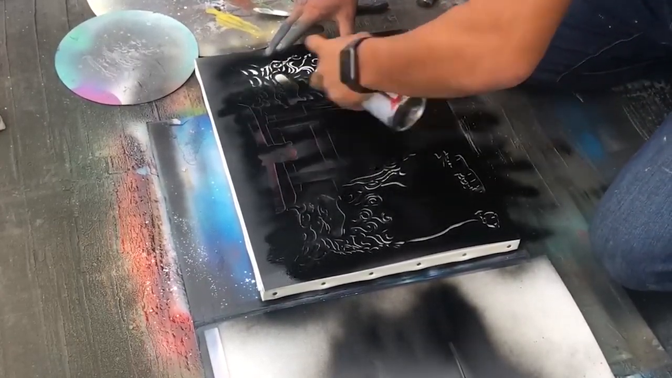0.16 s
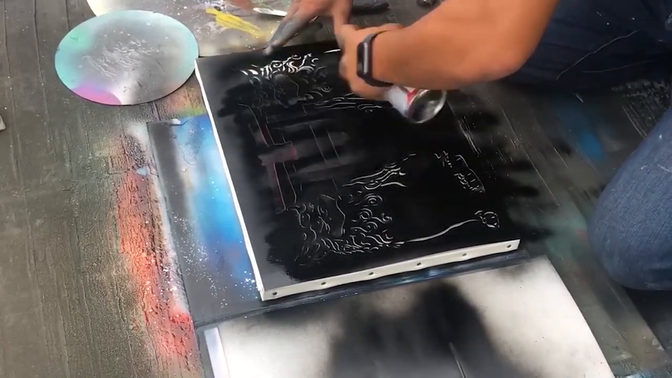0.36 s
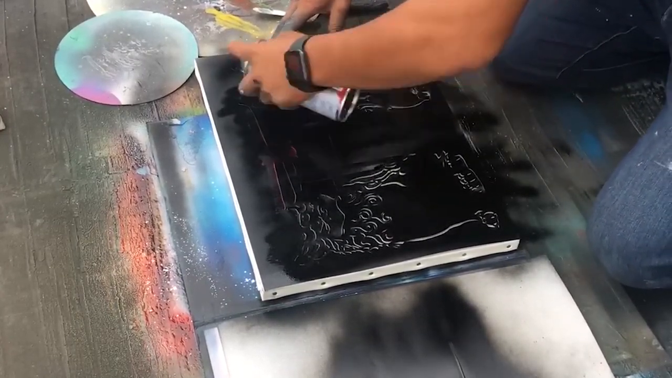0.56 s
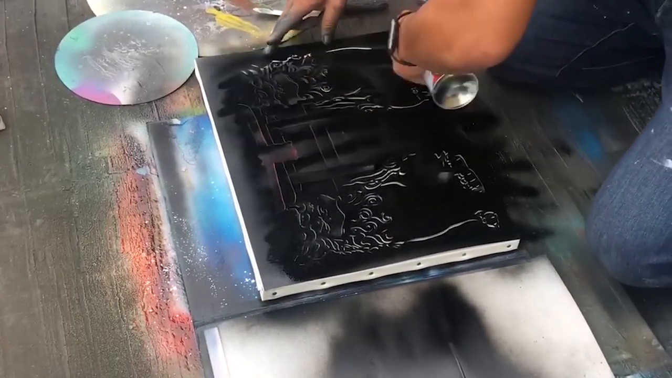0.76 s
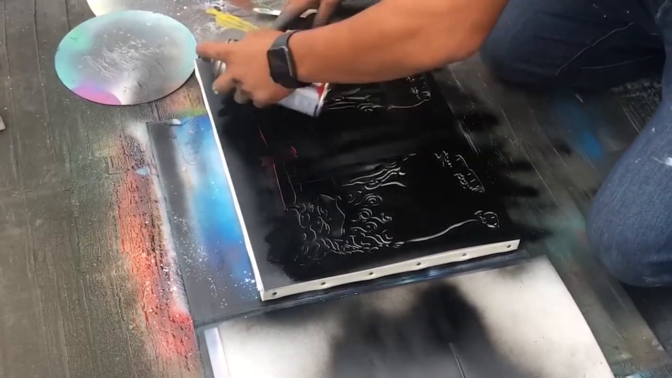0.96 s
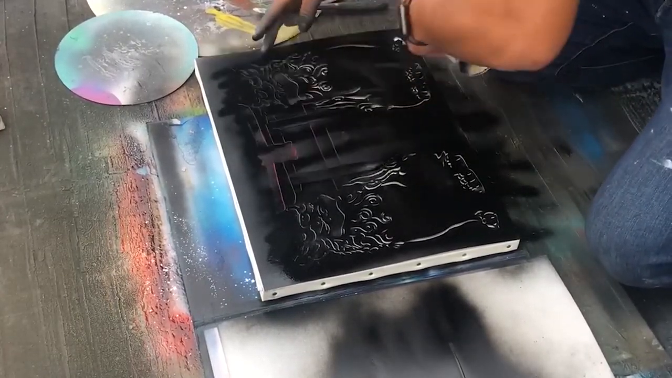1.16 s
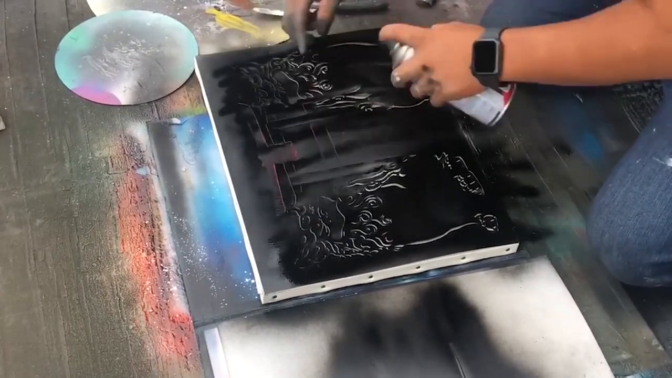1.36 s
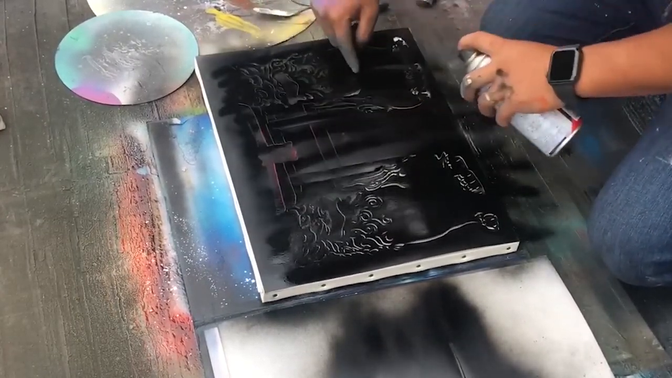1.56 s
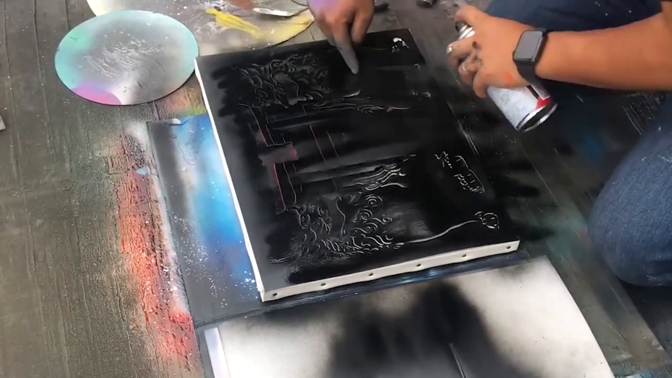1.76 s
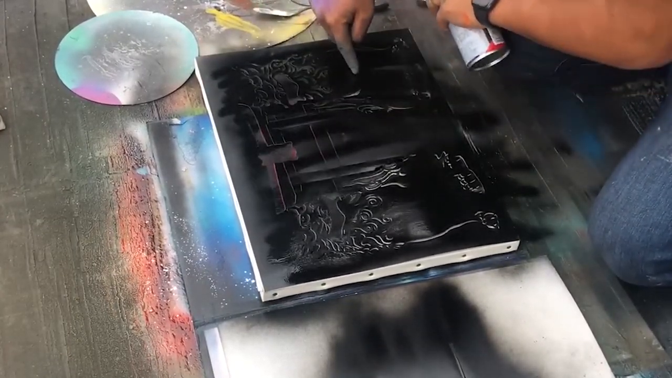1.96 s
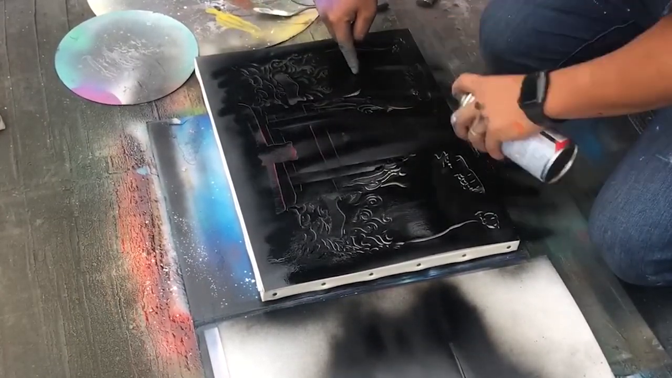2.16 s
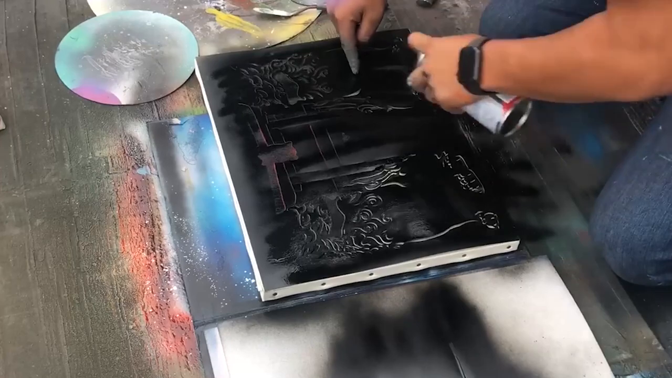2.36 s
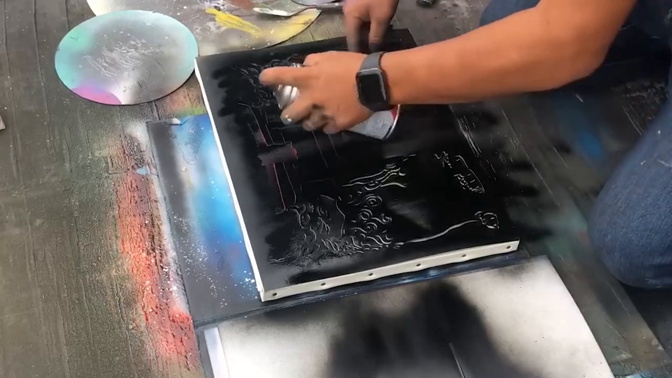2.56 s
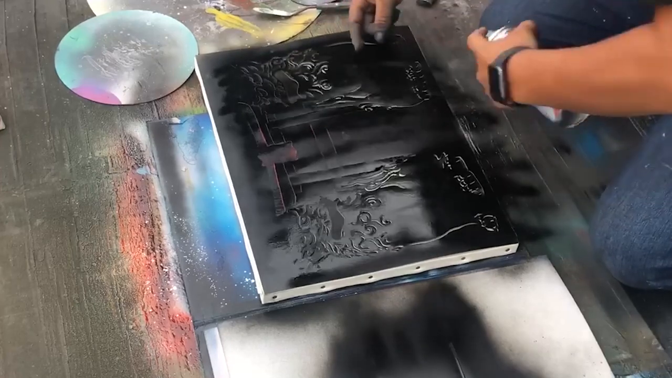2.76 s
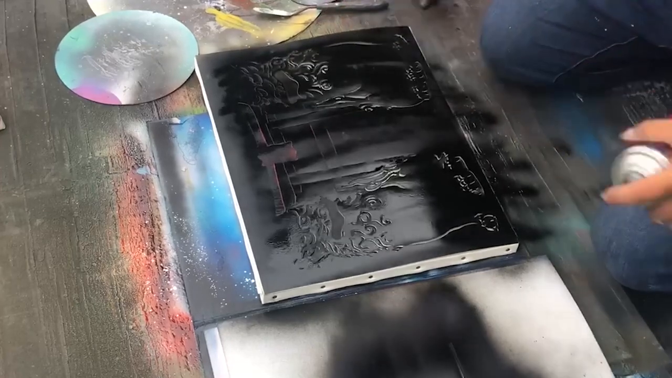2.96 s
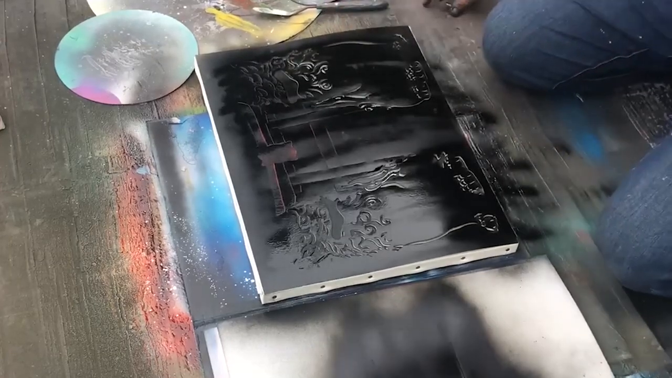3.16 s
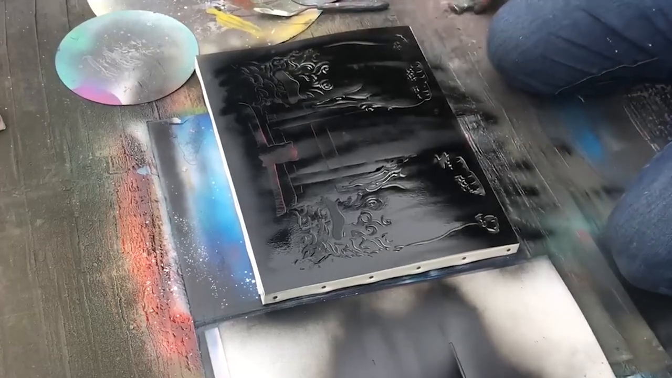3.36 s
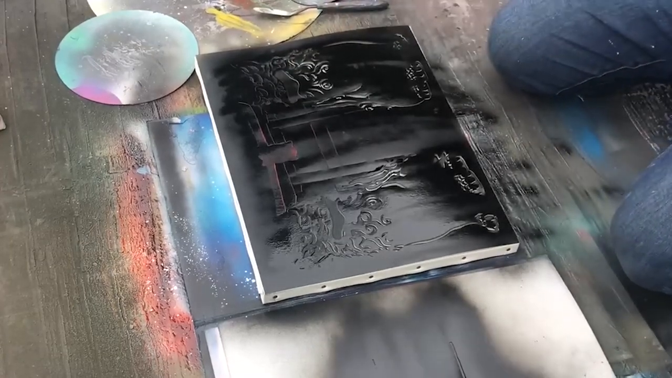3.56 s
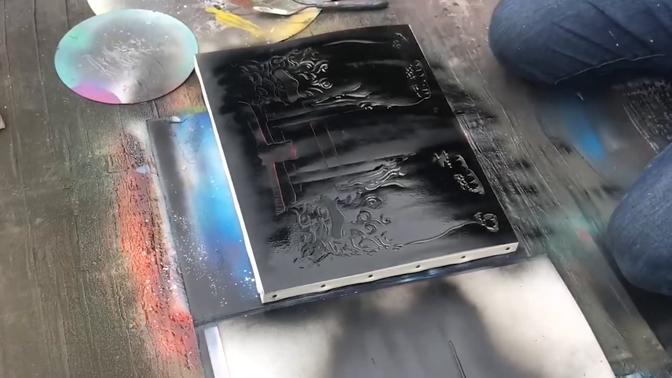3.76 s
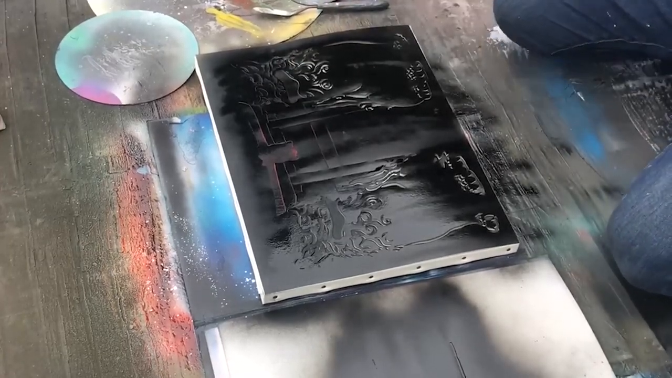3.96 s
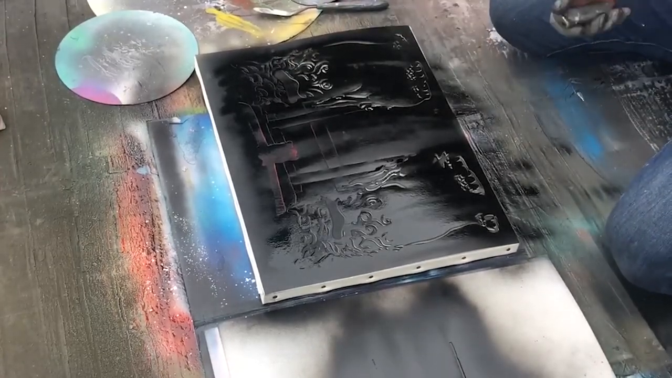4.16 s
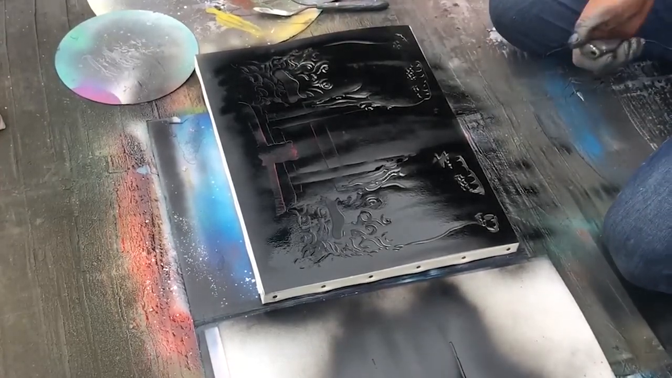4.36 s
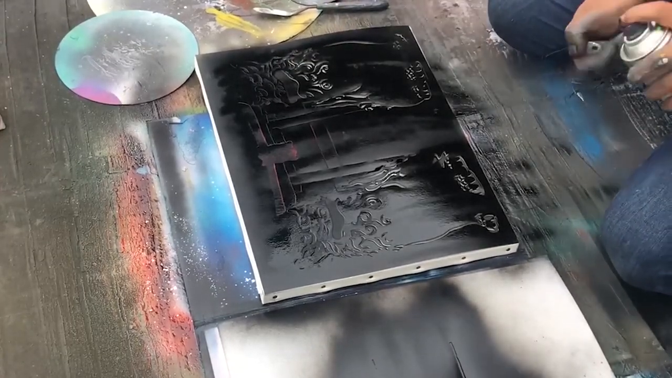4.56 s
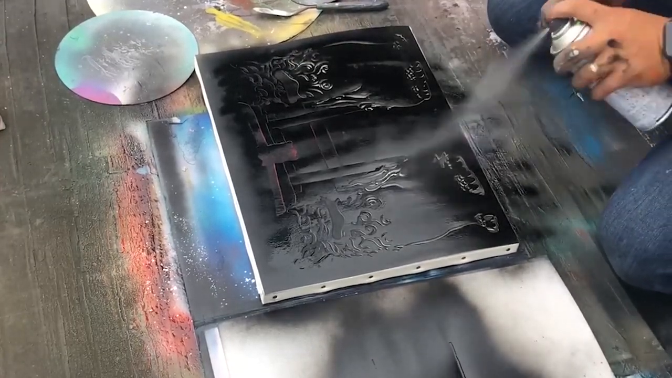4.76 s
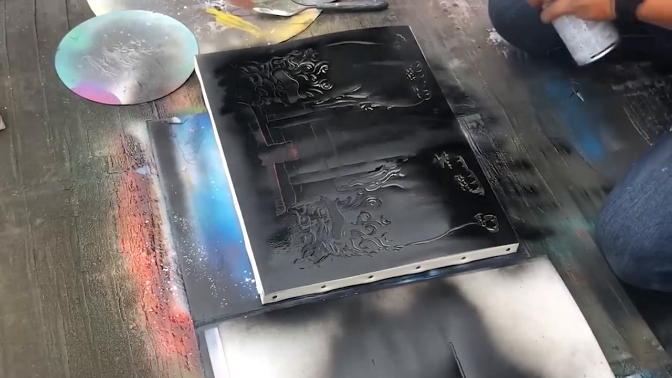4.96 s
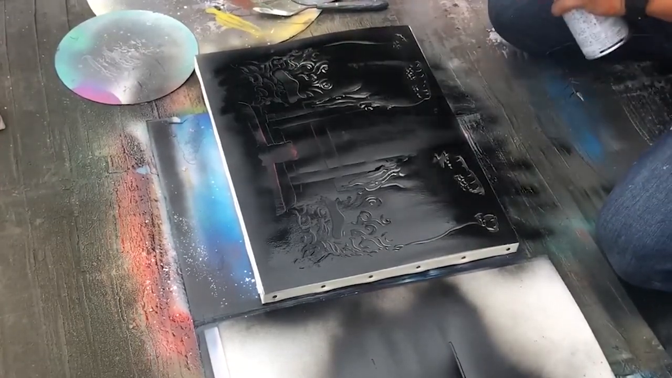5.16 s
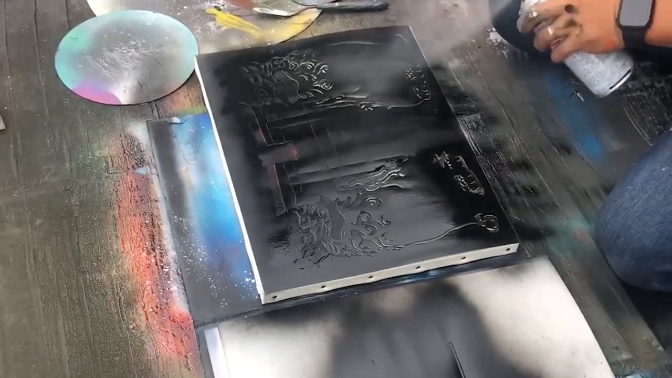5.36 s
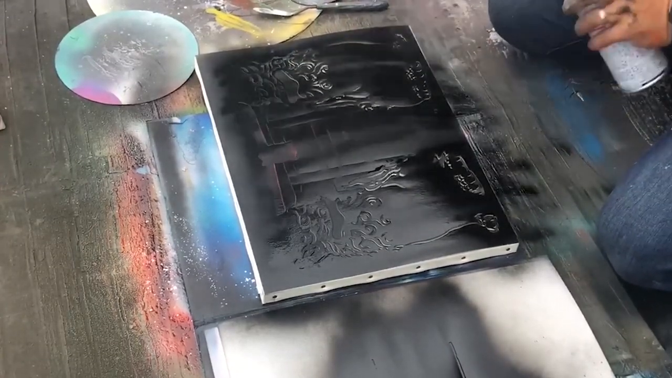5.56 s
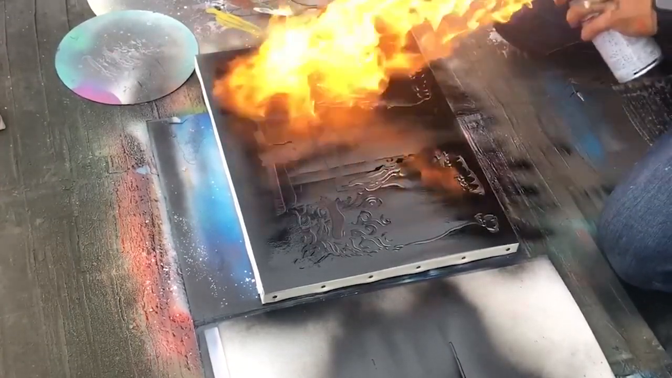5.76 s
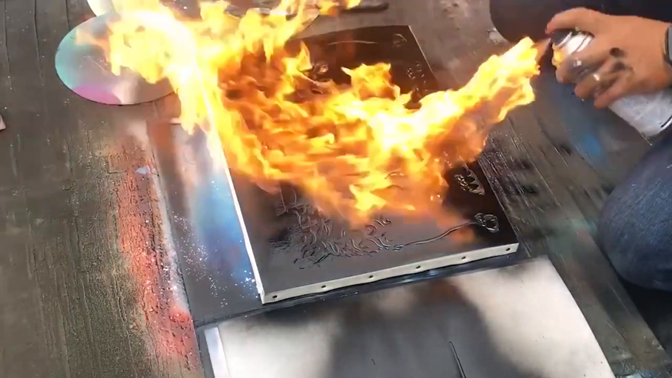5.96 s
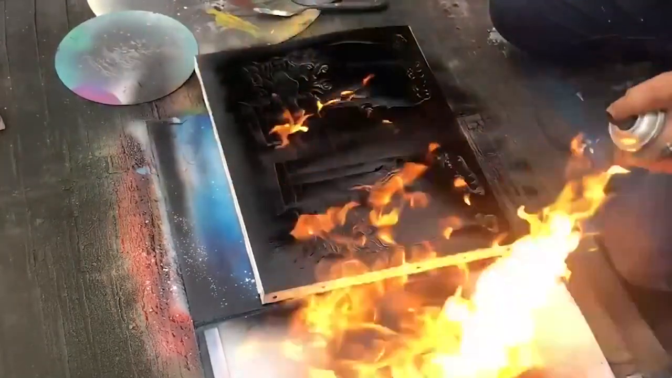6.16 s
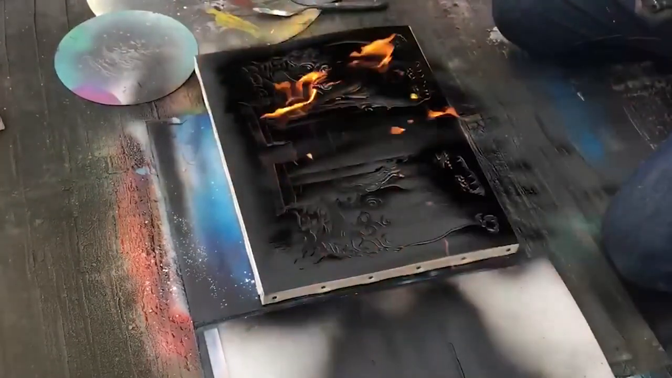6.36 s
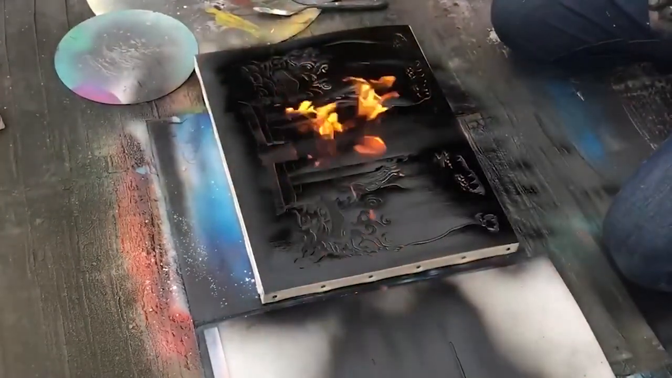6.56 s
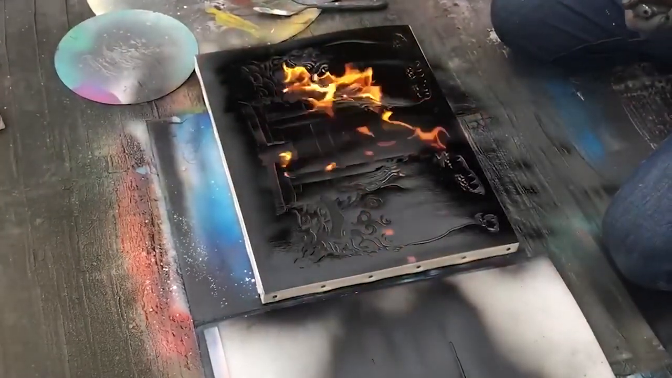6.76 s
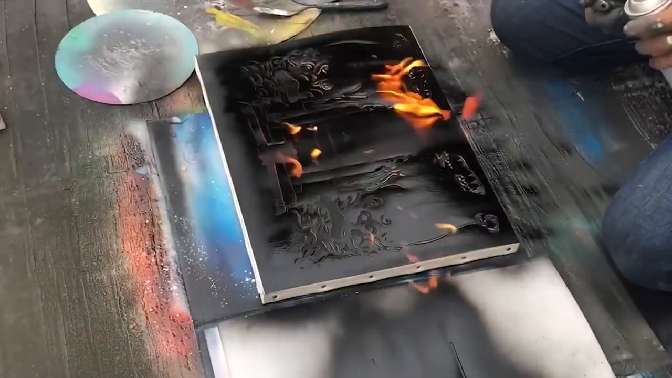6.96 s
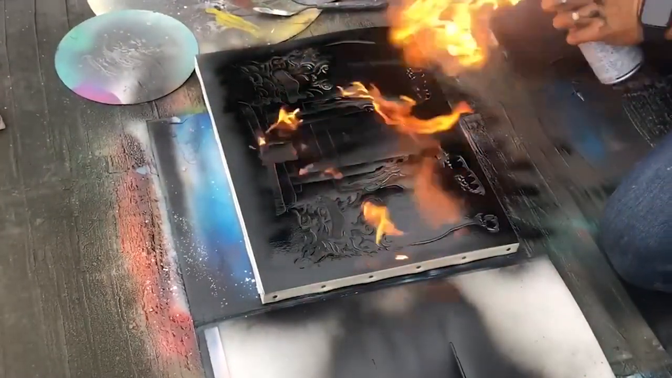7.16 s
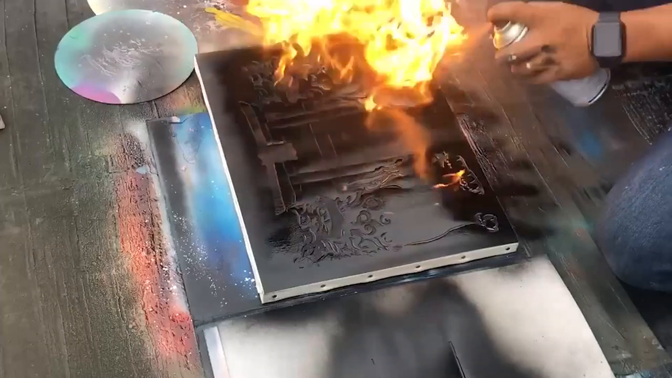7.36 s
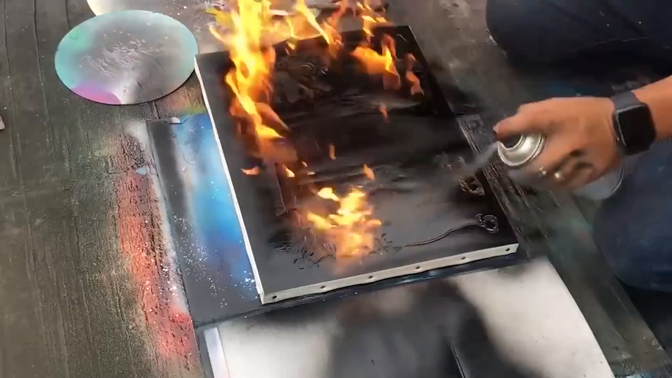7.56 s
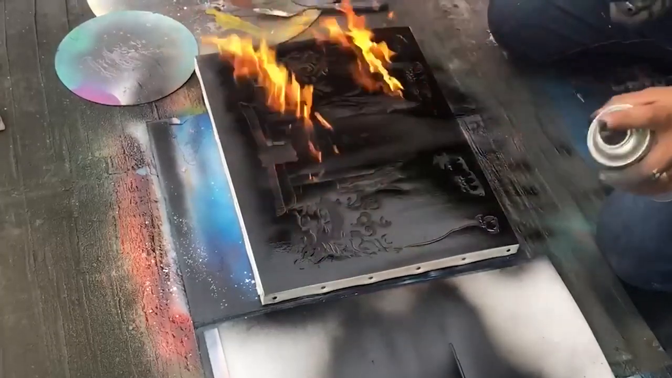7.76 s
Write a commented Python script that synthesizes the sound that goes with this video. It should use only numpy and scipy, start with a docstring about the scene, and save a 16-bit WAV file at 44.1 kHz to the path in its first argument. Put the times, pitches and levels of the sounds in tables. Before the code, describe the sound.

A spray can hisses in quick, clipped bursts while its mixing ball clicks and taps. After a pause the can knocks hard on pavement with a tinny clank, followed by light scrapes. Two longer hisses follow, then a sharp snap and the spray ignites into a roaring flare. Deep flutters and thumps batter the close outdoor microphone before a second, louder burn.

```python
"""Spray painter with a torch

Outdoors, a painter sprays a canvas on the ground in short bursts while the mixing ball clicks in the can.
A can is set down on the pavement, a lighter snaps, and the next bursts burn as a torch.
Jet, flame and wind are shaped noise; clicks, taps and knocks are pulses and decaying rings.
Each hiss is combed by its reflections off canvas and ground; wind and flame buffet the microphone."""
import sys
import numpy as np
from scipy import signal
from scipy.fft import rfft, irfft, next_fast_len
from scipy.io import wavfile
from scipy.ndimage import map_coordinates

SR = 44100
rng = np.random.default_rng(int(sys.argv[2]) if len(sys.argv) > 2 else 0)


def persist_wave(psi):
    """Save psi, clipped to +-1, as 16-bit WAV."""
    counts = np.round(np.clip(psi, -1, 1) * 32767).astype(np.int16)
    wavfile.write(sys.argv[1], SR, np.atleast_2d(counts).T)


N = 344421

# Tables named _COLOUR are relative noise or pulse spectra: freq_hz [Hz], density_db [dB per Hz]

# presses of the valve, each one sweep of the hand: start_s [s], end_s [s], hiss_db [dB],
# swell_db over the press [dB], splash_db on the canvas before its trim [dB],
# first_lag_ms and last_lag_ms of the canvas reflection before dip and jitter [ms]
BURSTS = [(0.027, 0.19, -43.5, -8, -44.5, 0.51, 0.3), (0.214, 0.33, -44, -3, -41.5, 0.29, 0.32),
          (0.408, 0.506, -43, -9, -41.5, 0.28, 0.22), (0.546, 0.666, -44.5, -1, -43, 0.33, 0.34),
          (0.744, 0.866, -42.5, -6, -43.5, 0.36, 0.19), (0.917, 1.037, -42, 0, -41, 0.3, 0.33),
          (1.105, 1.251, -43, -5, -40, 0.27, 0.35), (1.766, 2.022, -41.5, -3.5, -48, 0.51, 0.37),
          (2.135, 2.246, -41, 1, -51, 0.42, 0.3), (2.486, 2.594, -40.5, -8, -44, 0.29, 0.36),
          (2.728, 2.79, -40, -5, -42, 0.37, 0.25), (4.675, 5.053, -37, -3.5, -72, 1.15, 0.76),
          (5.235, 5.565, -36.5, 0, -92, 0.95, 0.96), (5.738, 6.259, -34, -3.5, -60, 0.93, 1),
          (7.175, 7.365, -41.5, -1, -38, 1.7, 0.7), (7.362, 7.742, -35.5, 2, -55, 0.44, 0.92)]
JET_COLOUR = [(880, -37), (1500, -11), (2510, -3), (2860, -5), (4780, -5.5), (6120, -1.5), (6690, -1),
              (7540, -1), (8920, 2), (10700, 4), (12700, 1), (15100, -2), (16000, 5)]
SPLASH_COLOUR = [(600, 1), (1500, 13), (2400, 10), (3200, 2), (5500, 7), (7500, 1), (10000, -22),
                 (16000, -14)]
# times the jet is alight: start_s [s], end_s [s]
FLAMES = [(5.753, 6.272), (7.237, 7.747)]
# strength of the torch through its two burns: time_s [s], roar_db [dB], tearing_db [dB], billow_db [dB]
BURNS = [(5.745, -80, -67, -83), (5.758, -33.5, -47, -37), (5.8, -35.5, -50, -28.5),
         (5.92, -40, -50.5, -32), (5.98, -35.5, -44.5, -30.5), (6.07, -33, -51, -28),
         (6.19, -35.5, -46, -24), (6.258, -38, -47.5, -36), (6.3, -69, -83, -85), (7.232, -80, -87, -80),
         (7.248, -27, -40.5, -25), (7.29, -35.5, -51, -25.5), (7.345, -40, -48, -22), (7.41, -31, -39, -20),
         (7.53, -36.5, -42.5, -17), (7.62, -30, -46, -24), (7.7, -39.5, -60, -29), (7.76, -53, -62, -58),
         (7.81, -70, -73, -60)]
ROAR_COLOUR = [(150, -17), (400, 6), (900, 2.5), (1500, 0.5), (2200, -7.5), (3200, -16.5), (5000, -17.5),
               (9000, -15)]
# flame fronts ripping
TEARING_COLOUR = [(900, -12), (1500, -10.5), (3400, 1), (4800, -12.5), (9000, -26)]
# puffs of burning paint: middle_s [s], peak_db [dB], width_s (Gaussian) [s], pitch_hz at the middle [Hz]
WHUMPS = [(5.776, -17.5, 0.012, 120), (6.532, -16, 0.0071, 95.2), (6.637, -10, 0.02, 88.4),
          (6.802, -9.5, 0.0076, 105.2)]
# air over the microphone, first breeze, then the draught of the fire: time_s [s], level_db [dB]
WIND_LEVEL = [(0, -33.5), (.13, -43), (.21, -36), (.3, -45.5), (.47, -46.5), (.56, -37), (.63, -31),
              (.76, -34.5), (.84, -39.5), (.9, -38.5), (.99, -46), (1.13, -36), (1.22, -36), (1.3, -56),
              (1.36, -52), (1.45, -40), (1.53, -37), (1.7, -47), (1.88, -46.5), (2.07, -36), (2.22, -41),
              (2.36, -33.5), (2.45, -40.5), (2.6, -31.5), (2.77, -43), (2.87, -39), (2.96, -48),
              (3.04, -34.5), (3.1, -42), (3.25, -37), (3.9, -38.5), (4.25, -33.5), (4.7, -35),
              (5.05, -33.5), (5.33, -44.5), (5.39, -43), (5.5, -36.5), (5.8, -21.5), (6.08, -38),
              (6.28, -35), (6.35, -33), (6.44, -20.5), (6.64, -18), (6.76, -31), (6.84, -24.5),
              (6.95, -23.5), (7.2, -27), (7.42, -21), (7.68, -22), (7.81, -43.5)]
RUMBLE_COLOUR = [(20, -40), (35, -8), (50, -1.5), (75, 2), (130, -1.5), (200, -8.5), (400, -40), (900, -80)]
EDDY_COLOUR = [(60, -16.5), (130, 1), (200, 1.5), (300, -4.5), (450, -14), (700, -23), (1200, -64),
               (2500, -55)]
# single gusts that slap the microphone: start_s [s], level_db [dB],
# bright_db tilting the upper colour [dB], length_s of the first 40 dB of decay [s]
GUSTS = [(0.062, -30, -46, 0.02), (0.627, -16.5, -15, 0.02), (0.702, -31, -7, .02),
         (0.717, -21, -31.5, 0.061), (1.187, -19.5, -17, 0.032), (1.217, -20.5, -29, 0.061),
         (1.407, -24.5, -23, 0.012), (1.425, -23.5, -20, 0.038), (1.442, -22.5, -29, .02),
         (1.452, -23, -31, 0.033), (1.471, -26, -20, .035), (1.509, -19, -15, 0.02),
         (1.519, -34, -15, .015), (1.541, -16, -19, 0.019), (1.555, -26, -22, .02), (1.568, -29, -42, .03),
         (1.653, -31, -15, 0.025), (1.681, -28, -39, 0.017), (1.757, -20.5, -31, 0.036),
         (1.774, -23, -28, 0.024), (1.809, -15, -15, 0.011), (1.818, -19, -31, .02),
         (1.832, -21.5, -43, .035), (1.855, -26, -27, 0.044), (1.883, -29, -42, 0.034),
         (1.916, -21.5, -21, 0.027), (1.966, -29, -34, .03), (2.046, -30.5, -33, 0.033),
         (2.274, -27, -10, 0.041), (2.513, -25, -41, 0.057), (2.546, -18.5, -52, 0.041),
         (2.577, -21.5, -25, 0.08), (2.623, -25, -41, 0.12), (2.654, -23.5, -38, 0.14),
         (2.711, -22.5, -15, 0.024), (3.295, -21, -35, 0.023), (3.845, -33, -35, 0.024),
         (3.655, -19, -61, 0.16), (4.12, -32, -40, 0.048), (4.238, -25, -33, 0.06), (4.281, -29, -26, .04),
         (4.448, -31, -21, 0.06), (4.83, -24, -28, 0.055), (4.989, -27.5, -13, 0.024),
         (5.084, -28, -29, 0.034), (5.378, -30, -38, 0.025), (5.593, -28, -28, .03),
         (5.711, -24, -58, 0.022), (4.884, -25, -18, 0.072), (5.06, -29, -36, .04),
         (5.248, -24, -36, 0.095), (5.747, -29, -8, .015), (5.761, -10, -0.5, 0.043),
         (5.779, -17, -29, 0.045), (5.867, -18.5, -37, 0.035), (6.123, -16, -25, .02),
         (6.165, -21, -19, 0.037), (6.274, -11.5, -23, 0.015), (6.296, -26, -5, 0.028),
         (6.31, -7.5, -26.5, 0.015), (6.389, -13, -22, 0.015), (6.432, -17, 6, 0.022),
         (6.444, -8, 5.5, 0.027), (6.455, -4, -17, 0.02), (6.486, -10, -24, 0.023), (6.506, -10, 5, 0.024),
         (6.517, -7, -3, 0.022), (6.531, -16, -30, 0.017), (6.551, -19, -17, 0.02),
         (6.563, -10, -24.5, 0.045), (6.596, -20.5, -18, 0.022), (6.626, -18, -20, 0.045),
         (6.642, -11.5, -21, 0.052), (6.664, -18, -20, 0.034), (6.690, -9, -9, 0.027),
         (6.697, -16, 4, 0.035), (6.711, -21, -13, .018), (6.786, -18, -28.5, 0.025),
         (6.98, -26.5, -19, 0.018), (7.141, -22, 44, 0.039), (7.153, -20, -60, 0.023),
         (7.248, -20, -41, .05), (7.298, -9, -42, 0.027), (7.35, -13, -23, .025), (7.413, -9, -46, 0.039),
         (7.387, -5.5, -50, 0.0094), (7.455, -7.5, -51, 0.021), (7.526, -5.5, -44, 0.023),
         (7.54, -11, -23, 0.014), (7.591, -9.5, -35, 0.051), (7.629, -9, -52, 0.04),
         (7.667, -14.5, -48, 0.028)]
# sharp metal clicks of mixing ball and lighter: start_s [s], level_db [dB], brightness_hz [Hz]
CLICKS = [(0.0374, -10, 5460), (0.136, -22.5, 5240), (0.167, -21.5, 8750), (0.2459, -18.5, 5200),
          (0.3584, -12, 5740), (0.381, -11, 6130), (0.427, -26, 7070), (0.492, -23, 4960),
          (0.5181, -27, 1970), (0.532, -18.5, 7800), (0.6828, -32, 1930), (0.7109, -35, 2190),
          (0.769, -11.5, 5060), (0.7846, -26, 4370), (0.84, -18.5, 6000), (0.8768, -22, 7600),
          (0.8938, -14.5, 9200), (1.007, -31, 2370), (1.053, -14, 5400), (1.1, -16, 5700),
          (1.159, -17.5, 5230), (1.2217, -21.5, 6700), (1.2658, -28.5, 2340), (1.278, -39, 2620),
          (1.383, -53, 2760), (1.4543, -33.5, 2390), (1.497, -42.5, 1620), (1.529, -38.5, 1700),
          (1.6112, -32.5, 1630), (1.6655, -32, 6840), (2.236, -21.5, 5900), (2.3865, -24, 5800),
          (2.419, -23, 2470), (2.4554, -33, 1630), (2.482, -30.5, 2500), (2.672, -11.5, 5570),
          (2.7105, -26.5, 3900), (2.746, -27, 4870), (2.793, -26.5, 7200), (2.8309, -18.5, 7300),
          (3.08, -20, 7100), (3.1913, -33.5, 5760), (3.221, -40, 6500), (3.278, -20, 8100),
          (3.813, -40, 2100), (3.865, -40.5, 4000), (3.9405, -36, 2280), (4.389, -33, 1830),
          (4.668, -21, 10400), (4.685, -17.5, 8550), (4.69, -22.5, 1950), (4.6901, -14.5, 6640),
          (4.738, -23.5, 10500), (5.194, -30, 8400), (5.253, -13.5, 6630), (5.7312, -12.5, 6700),
          (6.276, -26.5, 1780), (6.4046, -26, 2020), (6.574, -39, 2370), (6.7689, -34.5, 1720),
          (7.14, -24.5, 1500), (7.209, -15, 6400)]
CLICK_COLOUR = [(300, -38), (1200, -15.5), (2000, -6.5), (2700, -3.5), (3600, -1), (5600, 9.5), (7000, 6.5),
                (7800, 0.5), (9000, 4.5), (11500, -1.5), (16000, -1.5), (22000, -4)]
# light taps of the rolling ball on the can's wall: start_s [s], level_db [dB], pitch_hz [Hz]
TAPS = [(.009, -34, 2050), (.057, -34, 2330), (.082, -35, 2430), (0.157, -25, 2430), (0.172, -25, 2650),
        (.177, -34, 2510), (0.189, -34, 2400), (.202, -33, 2370), (.21, -32.5, 2390), (.304, -28.5, 2020),
        (0.352, -33, 2440), (0.428, -31, 2490), (.44, -31, 2450), (.494, -33, 2290), (.519, -35, 2530),
        (.533, -24, 2360), (.545, -28, 2470), (0.554, -28, 2320), (.579, -32.5, 2400), (.685, -24, 2150),
        (0.711, -21, 2430), (.743, -29, 2500), (.786, -27, 2430), (0.806, -29, 1590), (0.899, -25, 2800),
        (.915, -25, 2550), (.949, -27, 2360), (.98, -37, 2400), (1.008, -31, 2420), (1.069, -32, 2110),
        (1.175, -28, 2520), (1.267, -26, 2420), (1.28, -25, 2630), (1.384, -33, 2440), (1.463, -30, 1620),
        (1.475, -39, 1900), (1.499, -28.5, 1610), (1.732, -33, 2230), (1.748, -32, 1890),
        (2.299, -30.5, 1690), (2.388, -24, 2580), (2.419, -25, 2450), (2.456, -27, 1820),
        (2.482, -25, 1770), (2.502, -27, 1710), (2.531, -27.5, 1720), (2.562, -35, 1770),
        (2.769, -28.5, 2520), (2.813, -31, 2020), (2.852, -28.5, 2250), (2.884, -33.5, 1910),
        (2.914, -40, 2230), (3.121, -37.5, 2450), (3.445, -35, 2240), (4.283, -41, 1920),
        (4.404, -43, 2200), (4.422, -40, 2290)]
TAP_COLOUR = [(600, -28), (1500, 6), (2500, 9.5), (3500, 3.5), (6000, -1.5), (9000, -3), (15000, -19)]
# blows of the cans on the pavement: start_s [s], push_db [dB], knock_db [dB], knock_hz [Hz],
# clank_db [dB], ring_db [dB], rise_s (time constant) [s], t60_s of the main decay [s]
KNOCKS = [(3.492, -34, -18, 636, -24, -39, 0.0018, 0.068), (3.504, -36, -26, 660, -32, -42, .002, .06),
          (3.515, -36, -24, 580, -32, -39, .002, .06), (3.533, -38, -29, 620, -39, -46, .002, .04),
          (3.544, -40, -19.5, 504, -46, -41, 0.004, 0.067), (3.556, -40, -36, 620, -36, -52, .0005, .02),
          (3.57, -39, -26, 543, -19.5, -35.5, 0.0012, 0.075),
          (3.623, -25, -23, 1500, -42, -56, .001, 0.022),
          (3.6303, 6.5, -8.5, 810, -39, -35, 0.00043, 0.015),
          (3.6328, -12, -12, 484, -49, -50, 0.00043, 0.022),
          (3.645, -17, -18, 520, -24, -38, 0.0018, 0.043),
          (3.654, -17, -21, 644, -23, -36.5, 0.0011, 0.071), (4.28, -50, -50, 750, -59, -65, 0.00085, 0.03)]
# hard push of rim on stone
PUSH_COLOUR = [(80, -20), (300, -7), (600, -1), (1000, 0), (1550, 1), (2100, -14), (4200, -21), (6000, -32),
               (14000, -38)]
THUD_COLOUR = [(100, -15), (300, 0), (520, 11.5), (700, 7.5), (900, -6.5), (1500, -18), (2100, -38),
               (4000, -18.5), (12000, -28)]
CLANK_COLOUR = [(400, -14), (1000, 7), (1600, 2), (2600, 6.5), (3500, -10.5), (5000, -6), (7200, 1),
                (8500, -5.5), (11000, -1), (16000, -8)]
# ringing modes of the can: pitch_hz [Hz], level_db [dB], t60_s [s]
CAN_MODES = [(522, -3, .35), (593, -1, .12), (680, -1, .1), (1082, -7, .45), (1294, -6, .18),
             (1556, -6, .16), (1748, -6, .22), (1825, -9, .7), (1862, -11, .45), (2088, -13, .6),
             (2326, -11, .6), (2520, -7, .18), (2896, -17, .45), (3111, -11, .3), (5047, -24, .6),
             (6375, -14, .32), (6560, -13, .32), (7400, -10, .17), (8344, -26, .7), (9054, -24, .5),
             (11110, -24, .45)]
# fingers sliding over a can: middle_s [s], level_db [dB], width_s (Gaussian) [s], wall_db against the rub [dB]
HANDLING = [(2.33, -54.5, 0.044, -5), (2.857, -64.5, 0.23, 4), (3.124, -64, 0.0057, -4),
            (3.248, -56.5, 0.049, -29), (3.45, -56.5, 0.049, -8), (3.735, -53, 0.06, -2),
            (3.887, -48, 0.0089, -3), (4.03, -53.5, 0.058, -11), (4.267, -50.5, 0.045, -14),
            (4.402, -45.5, 0.0056, -1.5), (4.421, -47.5, 0.0077, -2), (4.597, -46, 0.035, -25)]
RUB_COLOUR = [(800, 2), (2200, 7.5), (3800, 0.5), (5500, 5.5), (8300, -2.5), (12000, -3), (16000, -8)]
GRIT_COLOUR = [(200, -14), (500, 19.5), (1200, 5.5), (2500, -6), (6000, -15), (14000, -13)]
# the foot of a can scraping stone as it is lifted: middle_s [s], level_db [dB], width_s (Gaussian) [s]
SCRAPES = [(3.753, -40.5, .012), (4.031, -37, .006), (4.052, -30, 0.0056), (4.067, -49, 0.018)]
SCRAPE_COLOUR = [(250, -13), (480, -1), (720, -7), (900, 3), (1100, -2), (1500, -19), (2300, -27),
                 (3500, -40), (10000, -40)]
# a rim that drags and sings as a can is picked up: middle_s [s], level_db [dB], width_s (Gaussian) [s]
DRAGS = [(3.875, -59, .012), (3.941, -51, 0.0086), (4.047, -48.5, 0.016), (4.113, -59, 0.013)]
# modes of the rim: pitch_hz [Hz], level_db [dB], width_hz [Hz]
RIM_MODES = [(2320, 1, 50), (5000, 0, 40), (8170, -3, 50), (8260, 1, 45), (8470, -3, 99)]
# larger drops from the nozzle: start_s [s], level_db [dB]
SPITS = [(4.728, -35), (4.763, -35), (4.787, -44), (4.803, -42), (4.836, -40), (4.856, -38), (4.948, -34),
         (4.97, -58), (4.984, -37), (4.993, -36), (5.029, -39), (5.044, -38), (5.06, -41), (5.452, -50)]
SPIT_COLOUR = [(900, -16), (2200, 5), (3500, -2), (5200, -5), (7500, 0), (15000, -14)]
# wash of the street: time_s [s], level_db [dB]
STREET_LEVEL = [(0, -54.5), (1.3, -53.5), (2.9, -54), (3.9, -47.5), (4.5, -53), (5.6, -49.5), (6.9, -50.5),
                (7.8, -48)]
STREET_COLOUR = [(100, -6), (400, 13), (1000, 6), (1700, 1), (2500, -5.5), (4000, -9.5), (7000, -13.5),
                 (11000, -21.5), (16000, -51)]

DIP_MS = 0.098  # the nozzle swoops closest in mid-sweep, and the lag shortens by this much
GROUND_LATER_MS = 0.13  # the ground lies below the canvas and answers later
CANVAS_SHARE, GROUND_SHARE = 0.36, 0.23  # gains of the two reflections
FLAME_SCATTER = 0.1  # part of the reflections that a flame scatters
SPUTTER_DB = 4.5  # depth of the splash's fast flutter
EDDY_DB, EDDY_GROWS = -8, 0.9  # eddies against rumble at the mean wind; dB of eddies per dB of wind
STIR_DB, STIR_S, STIR_LATE_S = -16.5, 0.015, 0.0059  # eddies around a gust: relative level, width, lag
SWAY_DB = -3  # slow pressure swing around a gust, against its eddies
WALL_T60_S, TICK_DB, TICK_T60_S = 0.013, 2.5, 0.0082  # a tap: wall decay; contact tick level and decay
REBOUND_DB, REBOUND_S = -16.5, 0.015  # level against the tap; typical delay
THUD_HZ = 520  # knock pitch at which the thud colour is unshifted
RING_FLUTTER_DB = 4  # the rocking rim touches the stone on and off: flutter depth of each mode
SHIFT_START_S, SHIFT_END_S, GRIT_DB = 3.68, 5.25, -52.5  # the painter shifts about between the cans
SPIT_T60_S = 0.022
HOLLOW_MS, HOLLOW_SHARE = 2.95, 0.5  # pavement echo in the roar: typical lag, gain
WHUMP_SAG_PER_S = 3  # relative fall of pitch as the fireball grows
TOP_HZ = 15950  # upper band limit


def amp(db):
    """Decibels to gain."""
    return 10 ** (np.asarray(db) / 20)


def unit(x):
    """x at rms 1."""
    return x / np.sqrt(np.mean(x ** 2) + 1e-20)


def curves(rows):
    """One value per sample for each column after the time."""
    s, *cols = np.transpose(rows)
    return [np.interp(np.arange(N) / SR, s, c) for c in cols]


def gate(start, end, fade):
    """1 between start and end, with linear fades just inside."""
    t = np.arange(N) / SR
    return np.clip(np.minimum(t - start, end - t) / fade, 0, 1)


def progress(start, end):
    """0 before start, rising evenly to 1 at end."""
    return np.clip((np.arange(N) / SR - start) / (end - start), 0, 1)


def arch(start, end):
    """0 at both ends of a span, 1 in its middle."""
    p = progress(start, end)
    return 4 * p * (1 - p)


def bump(middle, width):
    """A Gaussian swell and fade, 1 at its middle."""
    return np.exp(-0.5 * ((np.arange(N) / SR - middle) / width) ** 2)


def wobble(rate):
    """A smooth random curve, rate knots a second."""
    knots = rng.standard_normal(int(N * rate / SR) + 4)
    return map_coordinates(knots, [np.arange(N) * rate / SR])


def delayed(x, lag_ms, order):
    """x through a moving delay, interpolated between samples."""
    return map_coordinates(x, [np.arange(N) - lag_ms * SR / 1000], order=order)


def gains(points, size):
    """Gain of (Hz, dB) points on the FFT grid."""
    f, db = np.transpose(points)
    return amp(np.interp(np.log(np.fft.rfftfreq(size, 1 / SR) + 1), np.log(f), db))


def noise(points, size=N):
    """Coloured noise of rms 1."""
    m = next_fast_len(size, True)
    return unit(irfft(rfft(rng.standard_normal(m)) * gains(points, m), m)[:size])


def resonant_noise(response, m):
    """Noise of rms 1 through a complex response on an m-point FFT grid."""
    return unit(irfft(rfft(rng.standard_normal(m)) * response, m)[:N])


def pulse(points, size=1024):
    """The shortest causal pulse of a colour (minimum phase), with energy 1."""
    cepstrum = irfft(np.log(gains(points, size)))
    cepstrum[1:size // 2] *= 2
    cepstrum[size // 2 + 1:] = 0
    h = irfft(np.exp(rfft(cepstrum)))
    return h / np.linalg.norm(h)


def spatter(rate, spread_db):
    """Random impulses of very uneven size, rate per second, rms 1."""
    hits = rng.random(N) < rate / SR
    sizes = amp(spread_db * np.minimum(rng.exponential(size=N), 4))
    return unit(hits * rng.standard_normal(N) * sizes)


def grains(rate, spread_db, colour):
    """Spatter in which each impulse sounds as a coloured pulse."""
    return signal.fftconvolve(spatter(rate, spread_db), pulse(colour))[:N]


def add(out, s, x):
    """Mix x into out at time s."""
    i = max(round(s * SR), 0)
    out[i:i + len(x)] += x[:max(N - i, 0)]


def wind():
    """Slow pressure swings and smaller, lumpier eddies at the microphone; both thicken around each gust."""
    t, (wind_db,) = np.arange(N) / SR, curves(WIND_LEVEL)
    unrest_db = 2.9 * wobble(18)
    stirred = np.zeros(N)  # power
    for s, db, *_ in GUSTS:
        distance = (t - s - STIR_LATE_S) / STIR_S
        stirred += amp(db + STIR_DB) ** 2 * np.exp(-np.minimum(distance ** 2, 20))
    sway = np.sqrt(amp(wind_db) ** 2 + amp(SWAY_DB) ** 2 * stirred)
    rumble = sway * unit(noise(RUMBLE_COLOUR) * amp(unrest_db))
    mean_db = wind_db.mean()
    steady = amp(mean_db + EDDY_DB + EDDY_GROWS * (wind_db - mean_db))
    lumps = amp(unrest_db + 2.6 * wobble(70))
    eddies = np.sqrt(steady ** 2 + stirred) * unit(noise(EDDY_COLOUR) * lumps)
    return rumble + eddies


def street():
    """The soft, restless wash of the open street: coloured noise with a wavering level."""
    unrest_db = 1.2 * wobble(22)
    return amp(curves(STREET_LEVEL)[0] + unrest_db) * noise(STREET_COLOUR)


def reflected(x):
    """x plus its reflections off canvas and ground: a comb that sweeps with the nozzle, blurred by turbulence."""
    lag_points, swoop = [], np.zeros(N)
    for start, end, *_, first_ms, last_ms in BURSTS:
        lag_points += [(start, first_ms), (end, last_ms)]
        swoop += arch(start, end)
    turbulence_ms = 0.008 * wobble(150) + 0.008 * wobble(25)
    lag_ms = curves(lag_points)[0] - DIP_MS * swoop + turbulence_ms
    clear = 1 - FLAME_SCATTER * sum(gate(start, end, fade=0.19) for start, end, *_ in FLAMES)
    canvas = CANVAS_SHARE * delayed(x, lag_ms, order=3)
    ground = GROUND_SHARE * delayed(x, lag_ms + GROUND_LATER_MS, order=3)
    # hold the overall level while the reflections come and go
    return (x + clear * (canvas + ground)) / np.hypot(1, clear * np.hypot(CANVAS_SHARE, GROUND_SHARE))


def spray():
    """The jet hisses while the valve is down; on the canvas it also splashes and sputters in drops."""
    t, flow, splash = np.arange(N) / SR, np.zeros(N), np.zeros(N)
    for start, end, hiss_db, swell_db, splash_db, *_ in BURSTS:
        opening, closing = 1 + np.tanh((t - start) / 0.023), 1 + np.tanh((end - t) / 0.018)
        valve = opening * closing / 4
        flow += valve * amp(hiss_db + swell_db * (progress(start, end) - 0.5))
        splash += valve * amp(splash_db)
    jet = flow * noise(JET_COLOUR) * amp(1.7 * wobble(45))
    drops = grains(rate=710, spread_db=4.0, colour=SPLASH_COLOUR)
    sputter = amp(-10.5 + SPUTTER_DB * wobble(120))
    mist = splash * (noise(SPLASH_COLOUR) + amp(-7) * drops) * sputter
    return reflected(jet) + mist


def rattle():
    """The ball taps the wall of the swinging can and rebounds; the sloshing paint shifts the wall's pitch."""
    out, t = np.zeros(N), np.arange(SR // 25) / SR
    for s, db, hz in TAPS:
        pause, pitch = rng.standard_normal(size=2)
        rebound_at = s + REBOUND_S * np.exp(0.4 * pause)
        rebound = (rebound_at, db + REBOUND_DB, hz * np.exp(0.05 * pitch))
        for at, tap_db, wall_hz in [(s, db, hz), rebound]:
            wall = np.sin(2 * np.pi * wall_hz * t) * amp(-60 * t / WALL_T60_S)
            tick = noise(TAP_COLOUR, size=len(t)) * amp(TICK_DB - 60 * t / TICK_T60_S)
            add(out, at, amp(tap_db) * (wall + tick) * (1 - np.exp(-t / 0.0011)))
    return out


def clicks():
    """A hard contact gives one sharp pulse and a noisy ring that the hand-held can soon damps."""
    out, t = np.zeros(N), np.arange(SR // 16) / SR
    for s, db, brightness_hz in CLICKS:
        shift = (brightness_hz / 6200) ** 0.7
        colour = [(hz * shift, level + rng.normal(0, 1.5)) for hz, level in CLICK_COLOUR]
        # one swing of pressure and its mirror image, of opposite sign
        crack = np.fft.fftshift(irfft(1j * gains(colour, size=128))) * np.hanning(128)
        # a quick decay over a fainter, slower one
        wake = rng.standard_normal(len(t)) * (amp(-60 * t / 0.022) + amp(-27 - 60 * t / 0.08))
        flatter = [(hz, 0.69 * level) for hz, level in colour]
        ring = signal.fftconvolve(wake, pulse(flatter))
        add(out, s - 0.0005, amp(db + 14.3) * crack / np.linalg.norm(crack))
        add(out, s + 0.0012, amp(db + 12) * ring / np.linalg.norm(ring))
    return signal.sosfilt(signal.butter(2, 12000, fs=SR, output="sos"), out)


def gusts():
    """Each gust is one push of pressure with a short turbulent wake, both in its own colour."""
    out, t = np.zeros(N), np.arange(SR // 8) / SR
    for s, db, bright_db, length in GUSTS:
        colour = [(30, -35.0), (110, -6.0), (230, -2.5), (420, bright_db / 2 + 2.5), (850, bright_db - 5.5),
                  (1500, bright_db - 21.5), (2800, bright_db - 46.0), (8000, -78)]
        dying = amp(-40 * t / length) + amp(-32.0 - 60 * t / 0.13)
        wake = noise(colour, size=len(t)) * dying * (1 - np.exp(-t / 0.0028))
        push = pulse(colour, size=4096)
        add(out, s, amp(db - 3.5) * wake / np.abs(wake).max())
        add(out, s + 0.003, -amp(db - 1) * push / np.abs(push).max())
    return out


def handling():
    """Gritty rubbing as the cans change hands; it stirs the wall's modes."""
    m = next_fast_len(N, True)
    f = np.fft.rfftfreq(m, 1 / SR)
    # long-lived modes build up most under steady rubbing
    modes = sum(amp(db) * life ** 2 * hz / (f - hz + 20j) for hz, db, life in CAN_MODES)
    ring = resonant_noise(modes * gains(RUB_COLOUR, m), m)
    rub = noise(RUB_COLOUR) * amp(2.4 * wobble(160))
    return sum(amp(db) * bump(s, width) * (rub + amp(wall_db) * ring) for s, db, width, wall_db in HANDLING)


def can_ring(t):
    """The can's modes; rocking lets their phases drift and breaks up their ring."""
    drift = np.cumsum(rng.standard_normal((len(CAN_MODES), len(t))), axis=1) * 0.048
    flutter = RING_FLUTTER_DB * signal.resample(rng.standard_normal((len(CAN_MODES), 64)), len(t), axis=1)
    ring = np.zeros(len(t))
    for (hz, db, t60), phase, flutter_db in zip(CAN_MODES, drift, flutter):
        ring += amp(db + flutter_db - 60 * t / t60) * np.sin(2 * np.pi * hz * t + phase)
    return ring


def knocks():
    """The can meets the pavement: a hard push, a dull knock, a tinny clank and the ring of its wall."""
    out, t = np.zeros(N), np.arange(SR * 3 // 4) / SR
    push = pulse(PUSH_COLOUR)
    for s, push_db, knock_db, knock_hz, clank_db, ring_db, rise, t60 in KNOCKS:
        thud_colour = [(hz * knock_hz / THUD_HZ, db) for hz, db in THUD_COLOUR]
        thud = amp(knock_db) * noise(thud_colour, size=len(t))
        clank = amp(clank_db) * noise(CLANK_COLOUR, size=len(t))
        roughness = unit(amp(2.5 * wobble(250)[:len(t)]))
        dying = amp(-60 * t / t60) + amp(-16.0 - 60 * t / 0.19)
        contact = (thud + clank) * roughness * dying
        add(out, s, (contact + amp(ring_db) * can_ring(t)) * (1 - np.exp(-t / rise)))
        add(out, s + 0.00115, amp(push_db) * push / np.abs(push).max())
    return out


def grit():
    """Faint crunching on the pavement while the painter shifts about: scattered coloured pulses."""
    crunch = grains(rate=130, spread_db=2.0, colour=GRIT_COLOUR)
    return amp(GRIT_DB) * gate(SHIFT_START_S, SHIFT_END_S, fade=0.062) * crunch


def scrapes():
    """The can's foot chatters over the stone with a soft, hollow rasp of coloured noise."""
    return noise(SCRAPE_COLOUR) * sum(amp(db) * bump(s, width) for s, db, width in SCRAPES)


def drags():
    """Friction on the rim, as noise, excites a few thin, high modes."""
    m = next_fast_len(N, True)
    f = np.fft.rfftfreq(m, 1 / SR)
    modes = sum(amp(db) / (1 + 2j * (f - hz) / width) for hz, db, width in RIM_MODES)
    return resonant_noise(modes, m) * sum(amp(db) * bump(s, width) for s, db, width in DRAGS)


def spits():
    """Single drops break from the nozzle, each a short sizzle within the hiss."""
    out, t = np.zeros(N), np.arange(SR // 25) / SR
    for s, db in SPITS:
        envelope = amp(db - 60 * t / SPIT_T60_S) * (1 - np.exp(-t / 0.00053))
        add(out, s, envelope * noise(SPIT_COLOUR, size=len(t)))
    return out


def flame():
    """The jet catches, then roars hollowly over the pavement, crackles as its fronts tear, and billows."""
    roar_db, tearing_db, billow_db = curves(BURNS)
    roar = noise(ROAR_COLOUR) * amp(1.7 * wobble(70) + 1.3 * wobble(20))
    lag_ms = HOLLOW_MS * np.exp(0.07 * wobble(9))
    roar = roar + HOLLOW_SHARE * delayed(roar, lag_ms, order=1)
    crackle = grains(rate=710, spread_db=2.5, colour=TEARING_COLOUR)
    tearing = noise(TEARING_COLOUR) * amp(2 * wobble(110)) + amp(-2) * crackle
    billows = noise(EDDY_COLOUR) * amp(2.5 * wobble(60))
    return amp(roar_db) * unit(roar) + amp(tearing_db) * unit(tearing) + amp(billow_db) * unit(billows)


def whumps():
    """A fireball swells and collapses in a few slow swings of pressure, sagging in pitch."""
    t, out = np.arange(N) / SR, np.zeros(N)
    for s, db, width, hz in WHUMPS:
        sag = -WHUMP_SAG_PER_S * np.clip(t - s, -0.1, 0.1)
        pitch = hz * np.exp(sag + 0.1 * wobble(60))
        out += amp(db) * bump(s, width) * np.sin(2 * np.pi * np.cumsum(pitch) / SR)
    return out


def surroundings(x, t60):
    """A thin, diffuse answer from the street: x through a decaying noise tail."""
    t = np.arange(SR // 2) / SR
    tail = rng.standard_normal(len(t)) * amp(-60 * t / t60) * (1 - np.exp(-t / 0.02))
    return signal.fftconvolve(x, tail / np.linalg.norm(tail))[:N]


def scene():
    """All sources at one microphone; the street answers the painter's work but not buffeting or whumps."""
    can = spray() + rattle() + clicks() + spits() + flame()
    pavement = handling() + knocks() + grit() + scrapes() + drags()
    work = can + pavement
    answer = amp(-18.5) * surroundings(work, t60=0.3)
    return (work + answer + wind() + street() + gusts() + whumps())[None]


def record(dry):
    """Cuts the deepest rumble, rounds off the highest peaks and keeps nothing above the band limit."""
    lean = signal.sosfilt(signal.butter(4, 36, "high", fs=SR, output="sos"), dry)
    held = lean / (1 + (lean / 0.78) ** 6) ** (1 / 6)  # soft ceiling at 0.78
    m = next_fast_len(N + SR // 4)
    in_band = np.fft.rfftfreq(m, 1 / SR) < TOP_HZ
    return irfft(rfft(held, m) * in_band, m)[..., :N]


dry = scene()
out = record(dry)
persist_wave(out)
```